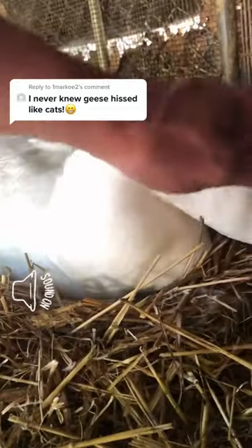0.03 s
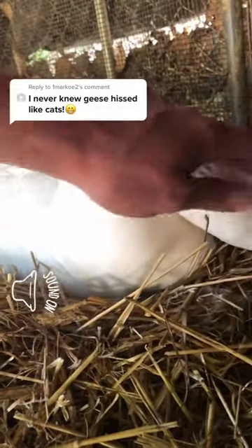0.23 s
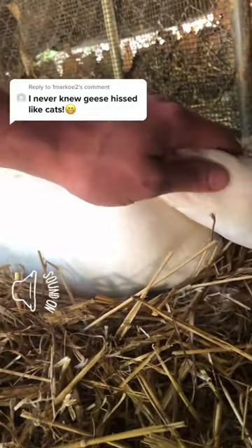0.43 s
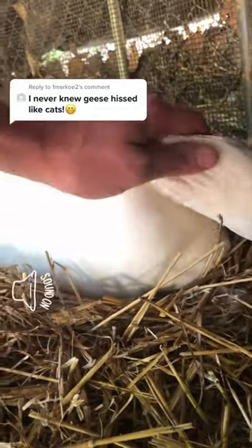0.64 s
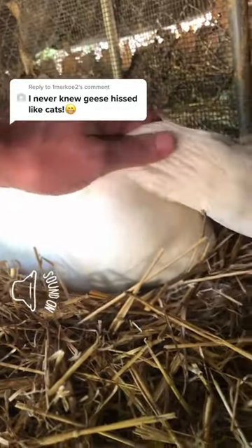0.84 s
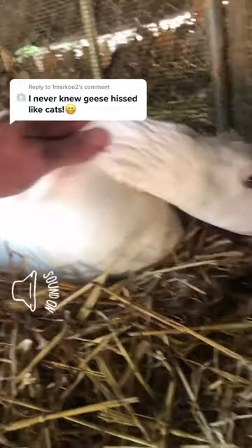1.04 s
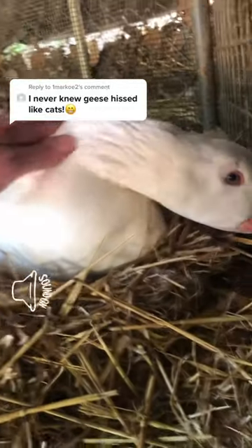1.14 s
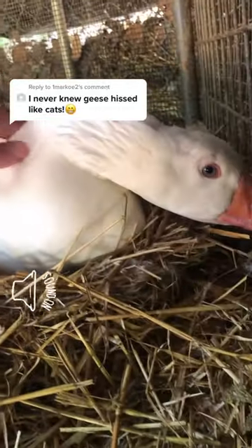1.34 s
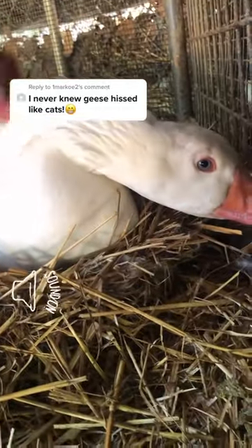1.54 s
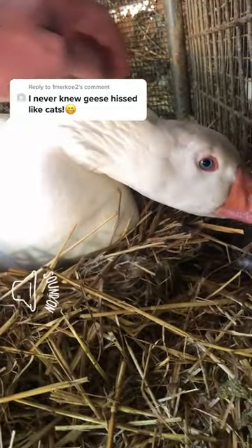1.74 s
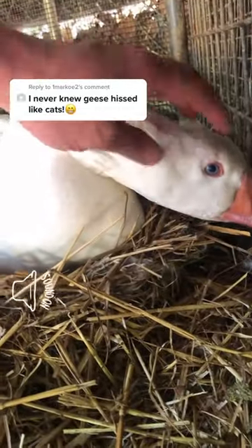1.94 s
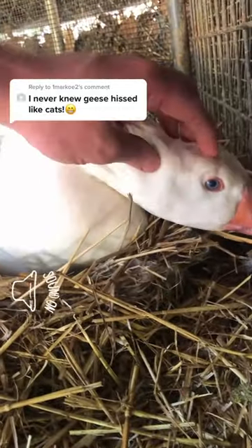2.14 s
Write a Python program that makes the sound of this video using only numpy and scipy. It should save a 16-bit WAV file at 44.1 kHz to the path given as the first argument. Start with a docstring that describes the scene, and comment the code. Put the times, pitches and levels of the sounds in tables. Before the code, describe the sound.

A goose close to the microphone gives a short rasping honk, a soft airy hiss, then a second honk, ringing lightly in a shed, with faint hand rubbing and straw rustle over low rumble.

```python
"""A goose, stroked by hand in a straw-floored pen, honks twice and hisses softly in between.
Each honk is a buzz of pulses at about 150 Hz that starts rough, clears, then rasps as the beak shuts.
Throat and mouth resonances colour the pulses; the hiss and a puff of breath are shaped air noise.
The shed rings behind the goose, over a low rumble, faint air, the rub of the hand and a rustle of
feathers and straw. One microphone feeds both channels."""
import sys
import numpy as np
from scipy import signal
from scipy.fft import rfft, irfft, next_fast_len
from scipy.io import wavfile

SR = 44100
rng = np.random.default_rng(int(sys.argv[2]) if len(sys.argv) > 2 else 0)


def transcribe(u):
    """Save the signal u as a 16-bit wav file named by the first command-line argument.

    u: samples, shape (n,) or (channels, n), limited to [-1, 1]; the rate is SR.
    q: integer samples, one column per channel.
    """
    v = np.clip(np.atleast_2d(u).T, -1, 1)
    q = np.round(v * 32767).astype(np.int16)
    wavfile.write(sys.argv[1], SR, q)


N = 97020
T = np.arange(N) / SR  # seconds


def amp(db):
    """Decibels to gain."""
    return 10 ** (np.asarray(db) / 20)


def unit(x):
    """Scales to rms 1."""
    return x / np.sqrt(np.mean(x ** 2) + 1e-20)


def read(points, hz):
    """Reads a spectrum table on a log-frequency axis."""
    f, value = np.transpose(points)
    return np.interp(np.log(hz + 1), np.log(f + 1), value)


def follow(table):
    """Every column of a time table at each sample; the end values hold outside it."""
    s, *columns = np.transpose(table)
    return [np.interp(T, s, column) for column in columns]


def gate(table):
    """Open from the first row of a time table to its last, with short sloped edges."""
    edge_s = 0.0026
    opening = np.clip((T - table[0][0]) / edge_s, 0, 1)
    closing = np.clip((table[-1][0] - T) / edge_s, 0, 1)
    return opening * closing


def colour(x, points, size=4096):
    """Minimum-phase filter with the given relative spectrum, scaled to rms 1."""
    log_gain = np.log(amp(read(points, abs(np.fft.fftfreq(size, 1 / SR)))))
    response = np.exp(np.conj(signal.hilbert(log_gain)))
    taps = np.fft.ifft(response).real[:size // 2]
    return unit(signal.fftconvolve(x, taps)[:N])


def noise():
    """White noise of rms 1."""
    return rng.standard_normal(N)


def drift(hz):
    """Slow chance of rms 1, up to about the given rate."""
    spectrum = rfft(noise()) / (1 + (np.fft.rfftfreq(N, 1 / SR) / hz) ** 4)
    return unit(irfft(spectrum, N))


def resonate(x, hz, stage_width):
    """Three equal one-pole stages around the curve hz (widths in Hz); keeps the power of white noise."""
    turn = np.exp(2j * np.pi * np.cumsum(hz) / SR)
    r = np.exp(-np.pi * stage_width / SR)
    low = x / turn  # the resonance is moved to 0 Hz, smoothed there and moved back
    for _ in range(3):
        low = signal.lfilter([1 - r], [1, -r], low)
    return (turn * low).real / np.sqrt(3 * np.pi * stage_width / (32 * SR))


def rumble():
    """Steady low noise from beyond the pen."""
    # Each row: frequency in Hz, relative density in dB.
    rumble_colour = [(20, -31), (35, -17), (50, -6.5), (90, 2), (125, -4), (175, -7), (230, -17),
                     (300, -17), (450, -19.5), (900, -48)]
    return amp(-54) * colour(noise(), rumble_colour)


def outdoor_air():
    """Faint steady noise of the air outdoors."""
    # Each row: frequency in Hz, relative density in dB.
    air_colour = [(100, -3.5), (400, 4), (800, 1), (1200, -4), (2000, -12), (4000, -16), (7000, -19),
                  (10000, -68)]
    return amp(-63.5) * colour(noise(), air_colour)


def fading_tone():
    """A narrow, wavering tone, made of resonant noise, that dies away from the start."""
    # One row: frequency in Hz, width of each resonator stage in Hz, starting level in dB, t60 in seconds.
    tone = (779.5, 32.5, -57.5, .6)
    hz, stage_width, db, t60 = tone
    fade = np.exp(-np.log(1000) * T / t60)
    return amp(db) * fade * resonate(noise(), np.full(N, hz), stage_width)


def hand_rub():
    """Low noise from the hand rubbing dully along the goose's neck."""
    # Each row: time in seconds, level in dB.
    rub_level = [(0, -55.5), (.15, -57), (.3, -90), (.55, -62.5), (.85, -54), (1.15, -52), (1.38, -55),
                 (1.5, -58.5), (1.7, -75), (2.0, -60.5), (2.2, -66)]
    # Each row: frequency in Hz, relative gain in dB.
    rub_colour = [(50, -27.5), (100, -8), (130, 1), (180, 1.5), (230, -9), (300, -17), (600, -45.5)]
    return amp(follow(rub_level)[0]) * colour(noise(), rub_colour)


def rustle():
    """Hand on feathers and straw: smooth noise with sparse random clicks as fine crackle."""
    # Each row: time in seconds, level in dB.
    rustle_level = [(0, -65.5), (.08, -63), (.16, -61), (.6, -61.5), (.95, -61.5), (1.2, -61), (1.29, -61),
                    (1.38, -71), (1.55, -83.5), (1.9, -54.5), (2.2, -58)]
    # Each row: frequency in Hz, relative gain in dB.
    rustle_colour = [(200, -24.5), (900, 5), (2500, -2.5), (4500, -5), (6500, -10), (10000, -21)]
    crackle_per_s, crackle_share = 340, 0.55  # share: rms beside the smooth noise
    crackle = unit((rng.random(N) < crackle_per_s / SR) * noise())
    return amp(follow(rustle_level)[0]) * colour(noise() + crackle_share * crackle, rustle_colour)


def straw_snaps():
    """Straw snaps as sudden bursts of white noise that die within milliseconds."""
    # Each row: time in seconds, starting level in dB.
    snaps = [(0.197, -40.5), (.2005, -47)]
    decay_s = 0.0016
    out = np.zeros(N)
    for s, db in snaps:
        out += amp(db) * (T >= s) * np.exp(-abs(T - s) / decay_s) * noise()
    return out


def puff():
    """Dull air noise as the goose readies its second honk."""
    # Each row: time in seconds, level in dB.
    puff_level = [(1.41, -91), (1.46, -58), (1.52, -52.5), (1.565, -57.5), (1.59, -74)]
    # Each row: frequency in Hz, relative gain in dB.
    puff_colour = [(200, -8), (380, 10.5), (600, 1.5), (780, -4), (1050, 6.5), (1300, -17), (1580, -7),
                   (2000, -20), (4000, -17), (10000, -64)]
    return gate(puff_level) * amp(follow(puff_level)[0]) * colour(noise(), puff_colour)


def hiss():
    """Air through two throat resonances that rise and sink; the upper one grows with effort."""
    # Each row: time in seconds, level in dB, lower resonance in Hz.
    breath = [(.78, -73, 1170), (.87, -60, 1245), (.99, -56.5, 1240), (1.1, -57, 1396), (1.18, -58, 1260),
              (1.275, -61, 1196), (1.315, -90, 1230)]
    lower_width_hz, upper_width_hz = 186, 610  # of each resonator stage
    upper_ratio, upper_db, brighten = 1.233, -1, 2.8  # brighten: further dB lost per dB below the peak
    db, hz = follow(breath)
    lower = resonate(noise(), hz, lower_width_hz)
    upper_gain = amp(upper_db + brighten * (db - db.max()))
    upper = upper_gain * resonate(noise(), hz * upper_ratio, upper_width_hz)
    return gate(breath) * amp(db) * (lower + upper)


def pops():
    """Mouth resonance that swells and dies within a few cycles as each honk breaks out."""
    # Each row: time in seconds, level in dB, frequency in Hz.
    onsets = [(.197, -40, 940), (1.567, -29, 970)]
    rise_s = 0.002
    out = np.zeros(N)
    for s, db, hz in onsets:
        t = np.maximum(T - s, 0)
        swell = t / rise_s * np.exp(1 - t / rise_s)
        out += amp(db) * swell * np.sin(2 * np.pi * hz * t)
    return out


def syrinx(turns, rough):
    """One pulse and one puff of air per cycle; roughness scatters the pulses and lets more air through."""
    jitter_s, spread_db = 0.000498, 0.5  # standard deviations at full roughness
    puff_share, puff_cycles, puff_floor = 0.62, 0.62, .2  # power share at full roughness, decay, steady air
    rough = np.clip(rough, 0, 1)
    at = np.flatnonzero(np.diff(np.floor(turns)) > 0)
    late, strong = rng.standard_normal((len(at), 2)).T
    place = np.interp(np.floor(turns[at + 1]), turns, np.arange(N))
    place = place + jitter_s * SR * rough[at] ** 2 * late
    # A windowed sinc sets each pulse between samples.
    near = np.round(place)[:, None].astype(int) + np.arange(-8, 9)
    shape = np.sinc(near - place[:, None]) * np.hanning(near.shape[1])
    shape = shape * amp(spread_db * rough[at] * strong)[:, None]
    pulses = np.bincount(np.clip(near, 0, N - 1).ravel(), shape.ravel(), N)
    puffs = (puff_floor + np.exp(-(turns % 1) / puff_cycles)) * noise()
    air = puff_share * rough ** 1.2
    return np.sqrt(1 - air) * unit(pulses) + np.sqrt(air) * unit(puffs)


def windpipe(x):
    """Echoes along the long windpipe, as all-pass delays, smear each pulse but leave the colour alone."""
    # Each entry: delay in seconds.
    delays = [.00113, .00191, .00307]
    strength = .5
    size = next_fast_len(N + SR // 4)
    hz, spectrum = np.fft.rfftfreq(size, 1 / SR), rfft(x, size)
    for s in delays:
        delay = np.exp(-2j * np.pi * hz * s)
        spectrum = spectrum * (strength + delay) / (1 + strength * delay)
    return irfft(spectrum, size)[:N]


def ringing(drive, centre, half, hz, db):
    """A narrow upper-throat resonance that swells and fades within a honk."""
    swell = np.exp(-((T - centre) / half) ** 2 / 2)
    return amp(db) * swell * resonate(drive, np.full(N, hz), 220)


def mouth(drive, mouth_hz, mouth_db, low_hz, low_db):
    """Pulses ring the mouth and noise rings a lower resonance; both slide down as the beak shuts."""
    mouth_width_hz, low_width_hz, low_cut_hz = 392, 82, 298  # widths of each resonator stage
    upper = amp(mouth_db) * resonate(drive, mouth_hz, mouth_width_hz)
    lower = amp(low_db) * resonate(noise(), low_hz, low_width_hz)
    high_pass = signal.butter(4, low_cut_hz, "high", fs=SR, output="sos")
    return signal.sosfilt(high_pass, upper + lower)


def honk(table, throat, ring):
    """Pulses sound the throat and mouth over a sine fundamental; a rougher rasp swells late."""
    # Each row: frequency in Hz, relative gain in dB.
    rasp_colour = [(250, -23.5), (500, -12), (800, 4.5), (1150, 5), (1350, -5.5), (1780, -0.5),
                   (1950, -0.5), (2330, 2), (2700, -13), (3000, -9), (3500, -4), (4050, -2.5), (4600, -0.5),
                   (5200, -13), (5800, -8.5), (6300, -11.5), (7100, -21), (10000, -31.5)]
    wobble, rasp_rougher = 0.00389, 0.13  # rms share of the pitch, added roughness
    hz, rough, voice_db, base_db, mouth_hz, mouth_db, low_hz, low_db, rasp_db = follow(table)
    turns = np.cumsum(hz * (1 + wobble * drift(28.8))) / SR
    drive = windpipe(syrinx(turns, rough))
    rasp_drive = windpipe(syrinx(turns + .5, rough + rasp_rougher))  # half a cycle apart
    voice = amp(voice_db) * colour(drive, throat)
    fundamental = amp(base_db) * np.sin(2 * np.pi * turns)
    mouth_sound = mouth(drive, mouth_hz, mouth_db, low_hz, low_db)
    rasp = amp(rasp_db) * colour(rasp_drive, rasp_colour)
    return gate(table) * (voice + fundamental + mouth_sound + ringing(drive, *ring) + rasp)


def goose():
    """Both honks with their pops, the hiss between them and the puff of breath."""
    # One table per honk. Each row: time in seconds, pitch in Hz, roughness 0-1, voice in dB,
    # fundamental in dB, mouth resonance in Hz and its level in dB, low resonance in Hz and
    # its level in dB, rasp in dB; the resonance levels are ahead of the mouth's high-pass.
    honks = [
        [(.191, 141.5, 0.84, -50, -87, 815, -45, 405, -50, -52),
         (.208, 141.6, 0.82, -39, -55, 900, -40.5, 450, -46, -55),
         (.25, 143.8, 0.45, -37.5, -45.5, 1050, -37.5, 488, -52.5, -69),
         (.31, 147.8, 0.46, -37, -38.5, 764, -51, 554, -49.5, -51),
         (.35, 149.1, 0.09, -37.5, -38.5, 1036, -35.5, 634, -57, -44),
         (.428, 150.5, 0.15, -33, -37, 1026, -35.5, 613, -66, -46.5),
         (.455, 150.3, 0.51, -51, -40.5, 850, -35, 610, -55, -28.5),
         (.485, 150.7, 0.68, -37.5, -38.5, 830, -43, 514.3, -52, -54),
         (.515, 146.6, 0.7, -59, -49.5, 590, -46.5, 429, -46.5, -56),
         (.545, 158, 0.9, -80, -56, 520, -55, 356, -71, -72)],
        [(1.566, 140.6, 0.94, -37, -57, 910, -43, 445, -53, -65),
         (1.572, 141.6, 0.63, -38, -56, 1005, -41, 478, -45, -58),
         (1.615, 143.6, .65, -38.5, -41.5, 1157, -35, 530, -52.5, -57),
         (1.655, 146.3, 0.29, -39, -38, 860, -66, 560, -61, -56.5),
         (1.725, 147.9, 0.16, -40.5, -36.5, 820, -62, 553, -68, -49.5),
         (1.775, 150.1, 0.25, -43.5, -35, 1003, -35, 577, -51.5, -51),
         (1.83, 149.7, 0.38, -39.5, -38.5, 1110, -36.5, 500, -52.5, -39.5),
         (1.865, 150.8, .6, -54, -37.5, 890, -45.5, 501, -43, -39.5),
         (1.9, 151.9, 0.6, -47, -50, 614, -42.5, 454, -43.5, -46.5),
         (1.935, 150.2, 1, -59, -49, 540, -57, 370, -49, -49)],
    ]
    # Throat colour, one table per honk. Each row: frequency in Hz, relative gain in dB.
    throats = [
        [(200, -41), (320, -12.5), (600, -8.5), (725, 4.5), (900, 0.5), (1200, 7), (1350, -6), (1500, 4),
         (1650, -2.5), (1950, -13.5), (2100, -5), (2250, -13), (2420, -8.5), (2700, -10), (2870, -6),
         (3020, -8), (3200, -13), (4150, -10.5), (4700, -14.5), (6400, -32.5), (7200, -40), (10000, -44)],
        [(200, -44), (300, -9.5), (450, -11), (590, 0.5), (730, 0.5), (900, -0.5), (1180, 0), (1330, -19),
         (1480, 7.5), (1620, -16.5), (1780, -4), (1950, -13.5), (2500, -17), (2660, -4), (2800, -28),
         (2960, -5.5), (3200, -17.5), (4150, -17), (5000, -25.5), (6400, -35), (7200, -38.5), (10000, -47.5)],
    ]
    # Throat ring in the clear part, one row per honk: centre in seconds, spread in seconds,
    # frequency in Hz, level in dB.
    rings = [(0.38, 0.051, 2875, -47.5), (1.65, 0.064, 2659, -50)]
    calls = sum(honk(*call) for call in zip(honks, throats, rings))
    return calls + pops() + hiss() + puff()


def echo(levels, fade):
    """One second of noise whose bands have the given energy and die away as fade(hz, t)."""
    hz, t, z = signal.stft(rng.standard_normal(SR), SR, nperseg=256)
    shape = fade(hz[:, None], t[None])
    shape = shape / np.sqrt(np.mean(shape ** 2, axis=1, keepdims=True) * SR)
    shape = shape * amp(read(levels, hz))[:, None]
    return signal.istft(z * shape, SR, nperseg=256)[1][:SR]


def shed(x):
    """Quick scatter from the pen walls, then a tail in which each band dies at its own speed."""
    # Quick scatter. Each row: frequency in Hz, echo level in dB.
    near_db = [(150, -46), (600, -22), (1200, -12), (2500, 8.5), (4500, -2), (9000, 5.5)]
    # Tail. Each row: frequency in Hz, echo level in dB.
    tail_db = [(150, -36), (500, -15.5), (900, -13), (1250, -12), (2300, -1.5), (3200, 0.5), (4500, 0),
               (5500, -4), (9000, -7)]
    # Tail decay. Each row: frequency in Hz, t60 in seconds.
    tail_t60 = [(150, 3), (500, 0), (1200, 2.24), (2400, 1.35), (4500, 0.77), (9000, 1.2)]
    near_decay_s, build_s = 0.036, 0.0083

    def near_fade(hz, t):
        return np.exp(-t / near_decay_s)

    def tail_fade(hz, t):
        return np.exp(-np.log(1000) * t / read(tail_t60, hz)) * (1 - np.exp(-t / build_s))

    response = echo(near_db, near_fade) + echo(tail_db, tail_fade)
    return signal.fftconvolve(x, response)[:N]


def scene():
    """The goose and its pen, heard by one microphone; only the goose rings the shed."""
    bird = goose()
    background = rumble() + outdoor_air() + fading_tone()
    hand = hand_rub() + rustle() + straw_snaps()
    mono = bird + shed(bird) + hand + background
    return np.array([mono, mono])


def record(dry):
    """The recorder's band limit: a steep low-pass."""
    edge_hz = 10180
    low_pass = signal.firwin(511, edge_hz, window=("kaiser", 9), fs=SR)
    return signal.oaconvolve(dry, low_pass[None], "same")


dry = scene()
out = record(dry)
transcribe(out)
```